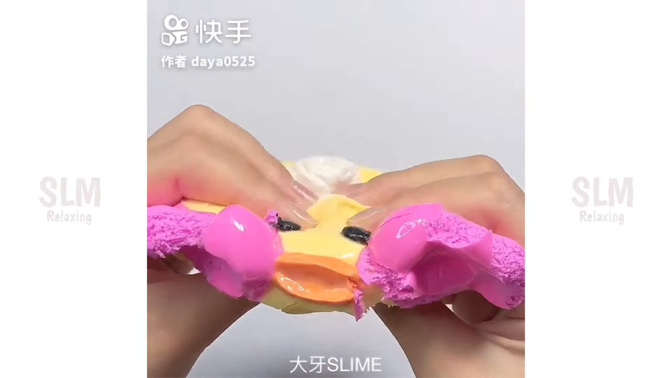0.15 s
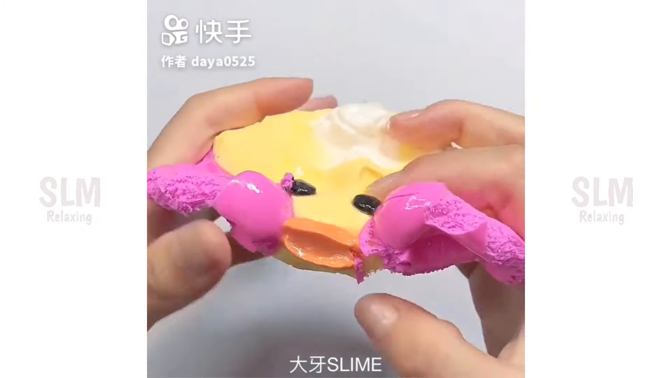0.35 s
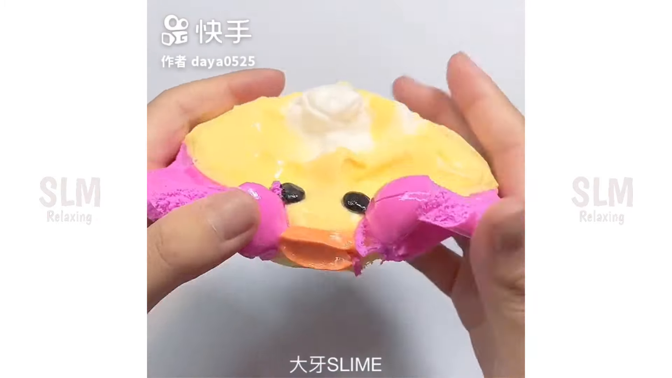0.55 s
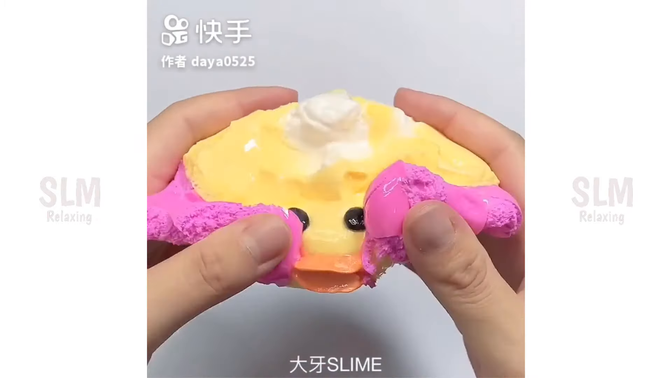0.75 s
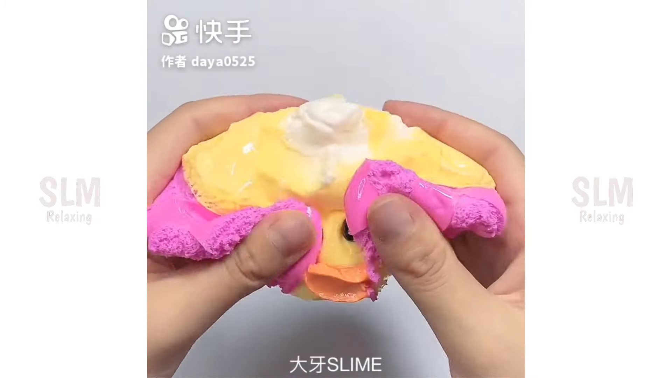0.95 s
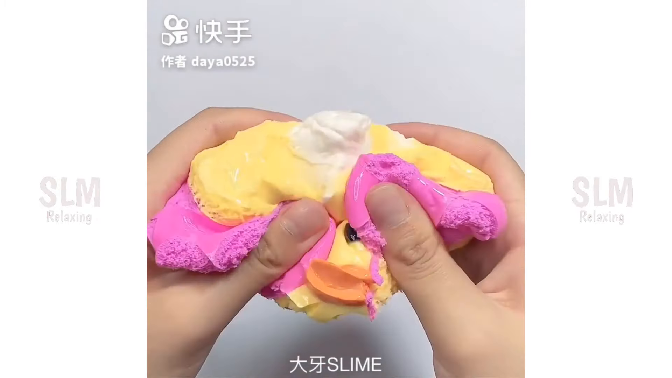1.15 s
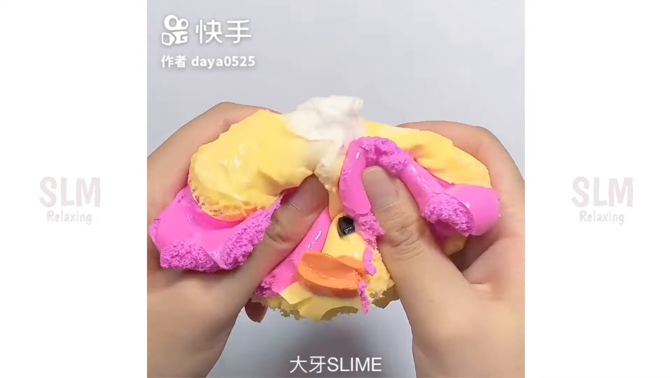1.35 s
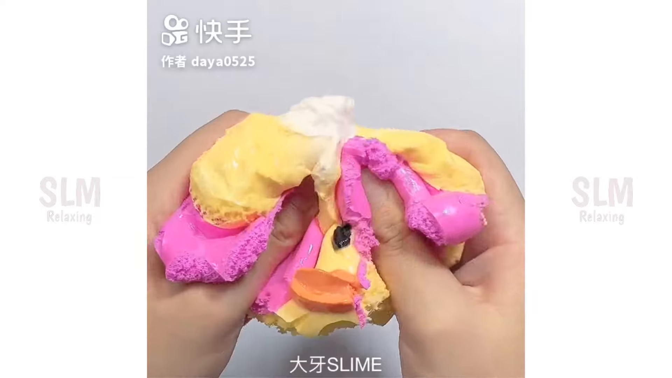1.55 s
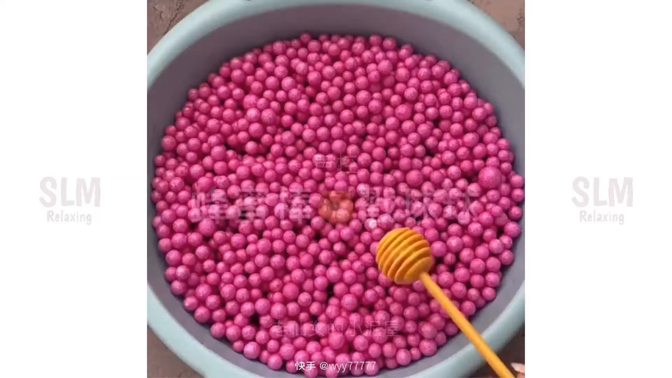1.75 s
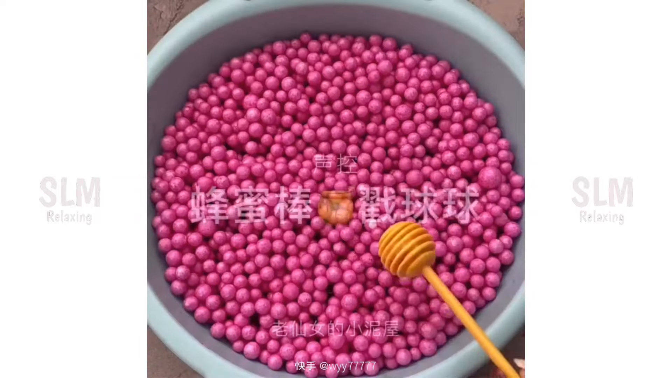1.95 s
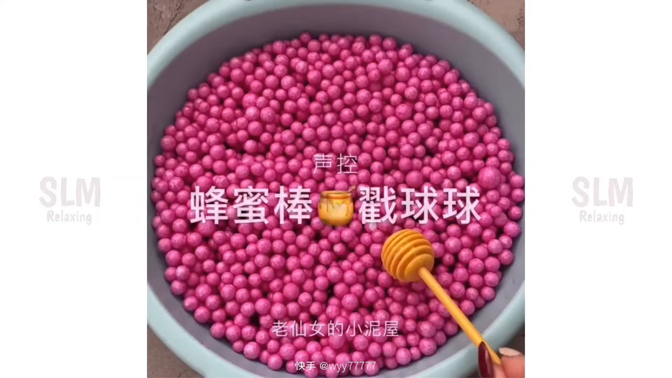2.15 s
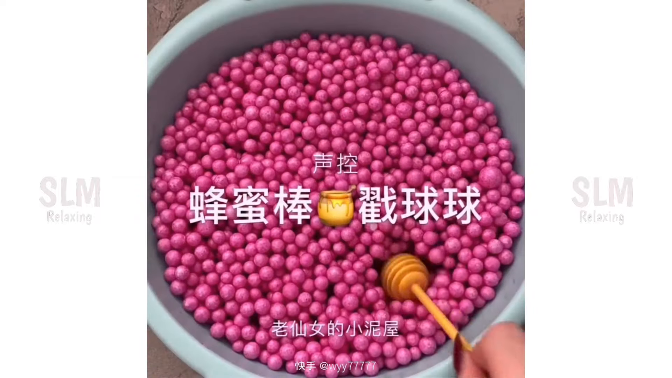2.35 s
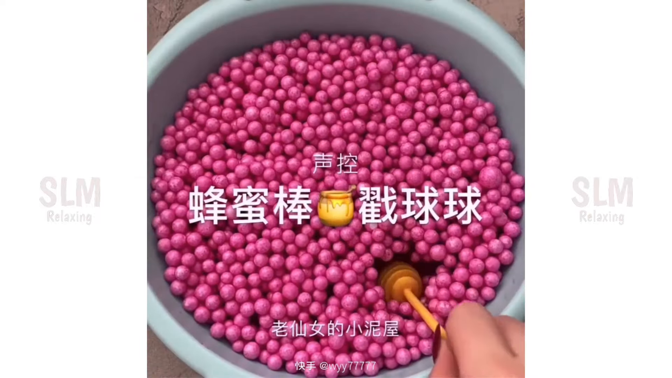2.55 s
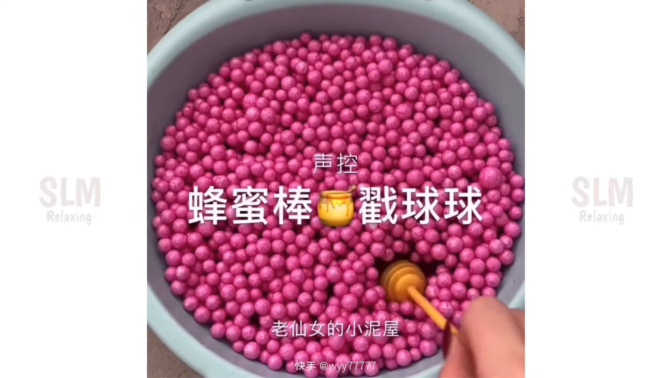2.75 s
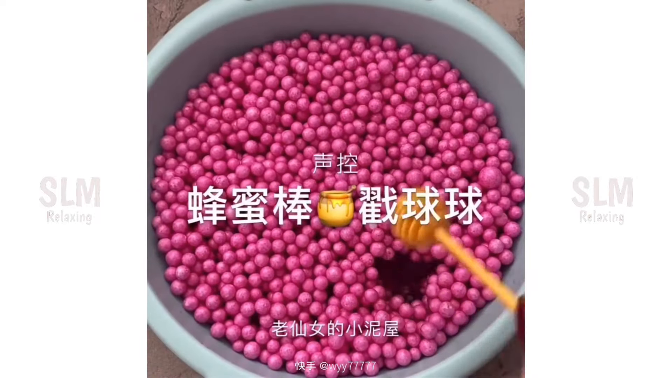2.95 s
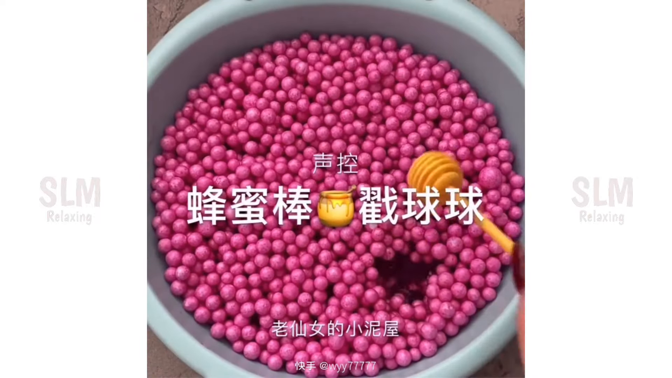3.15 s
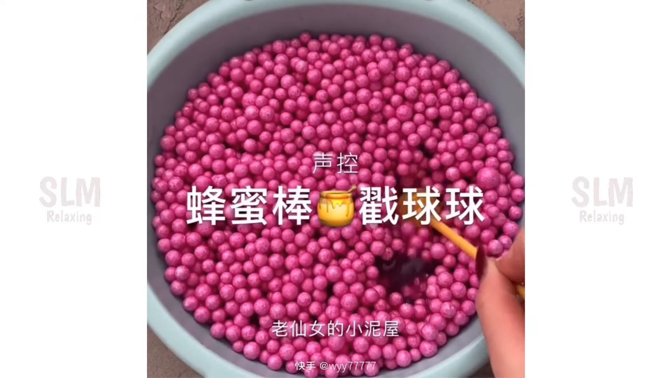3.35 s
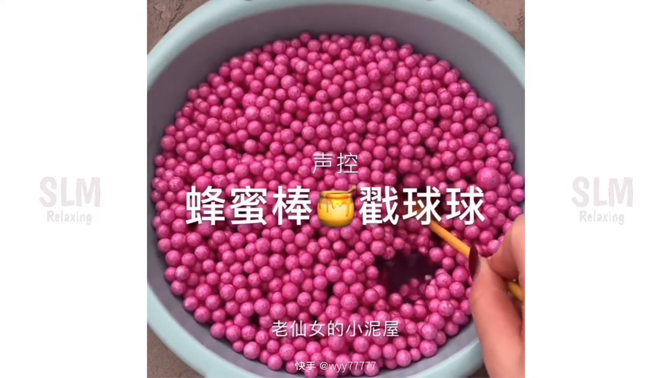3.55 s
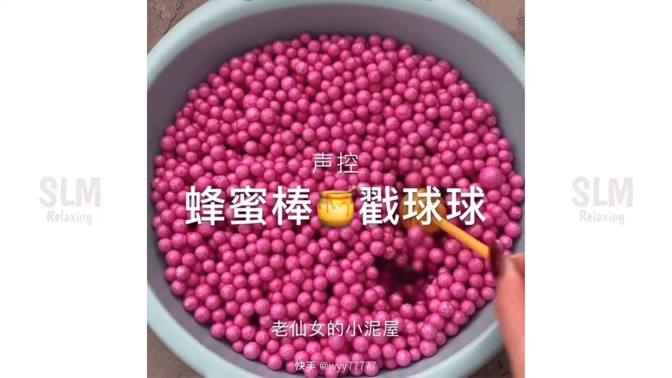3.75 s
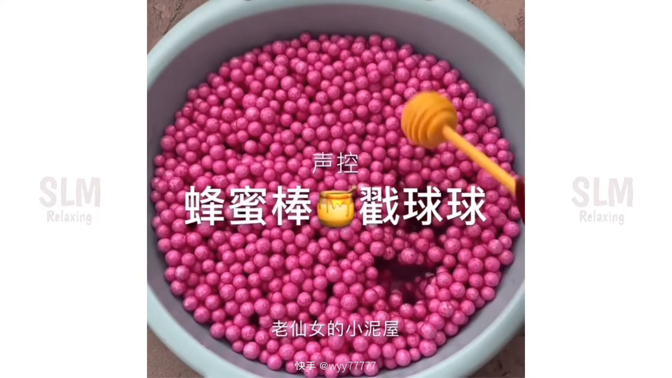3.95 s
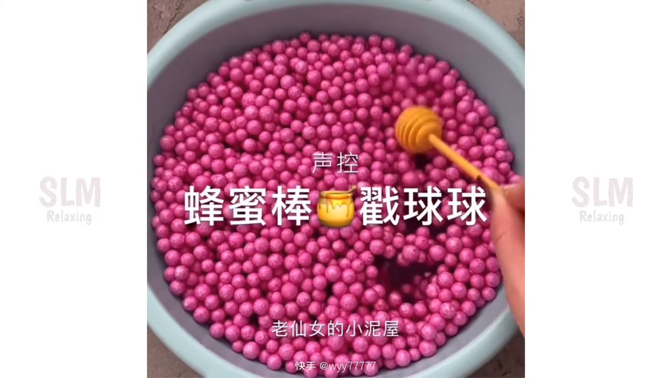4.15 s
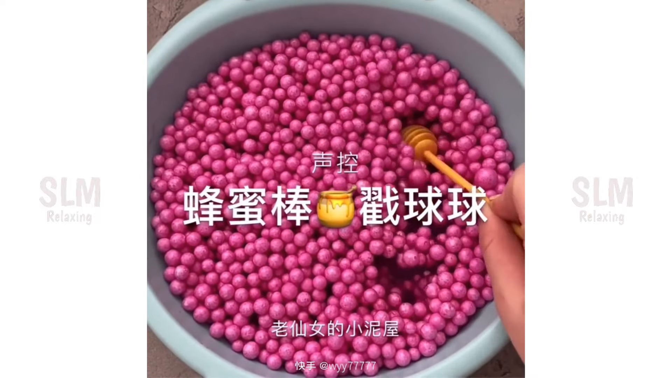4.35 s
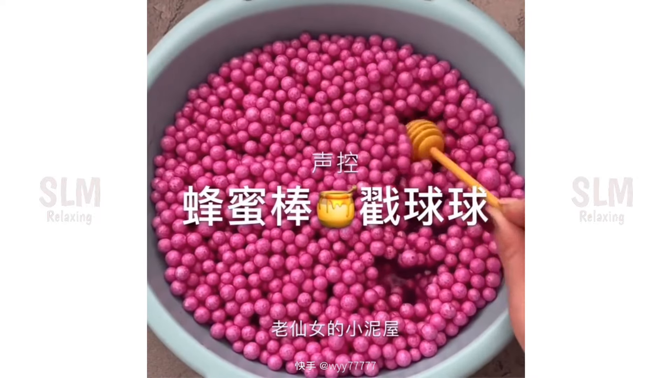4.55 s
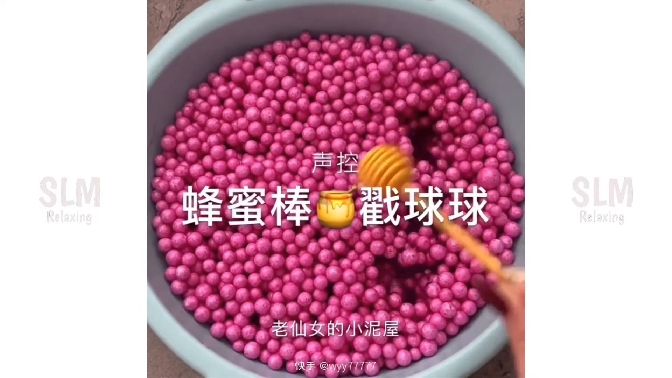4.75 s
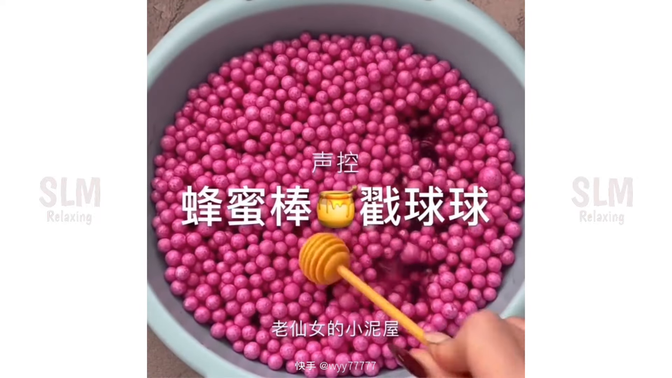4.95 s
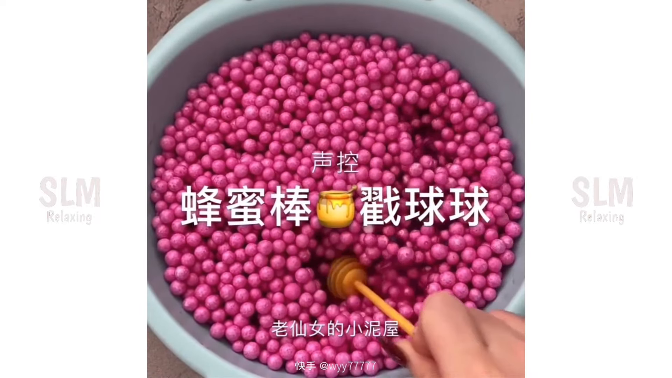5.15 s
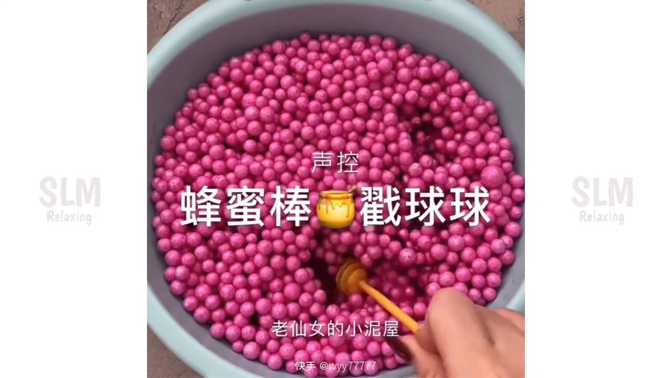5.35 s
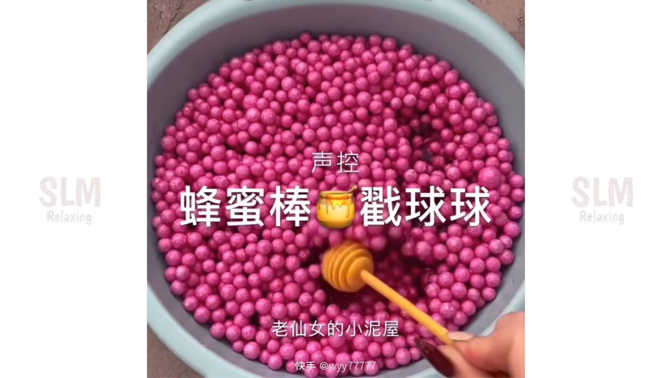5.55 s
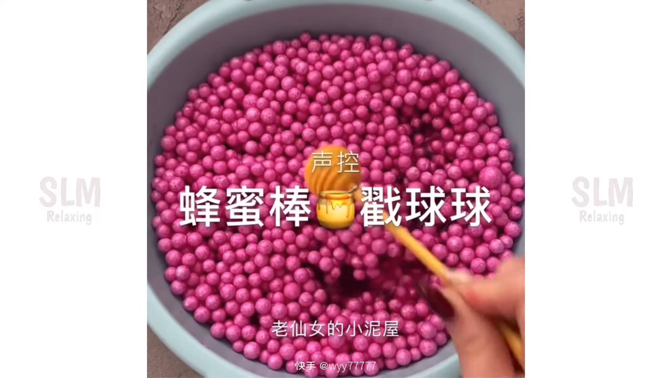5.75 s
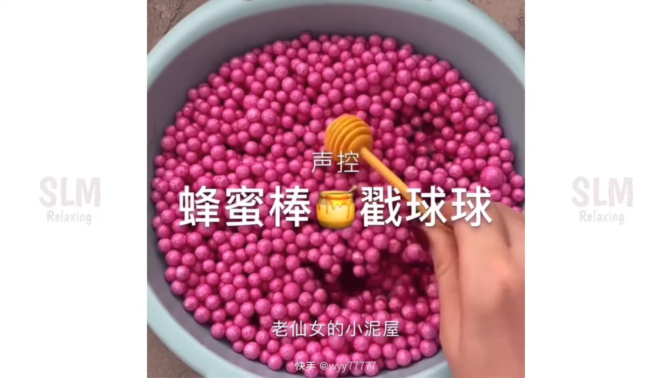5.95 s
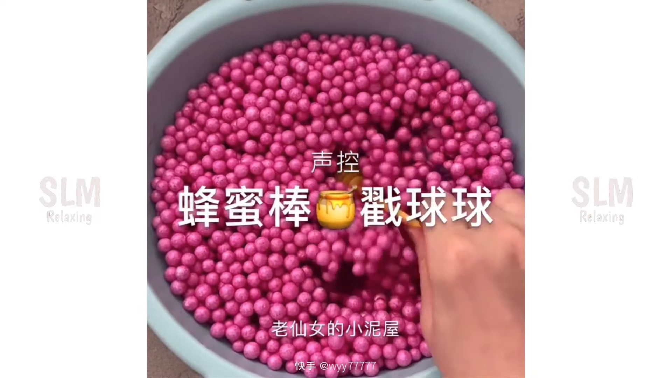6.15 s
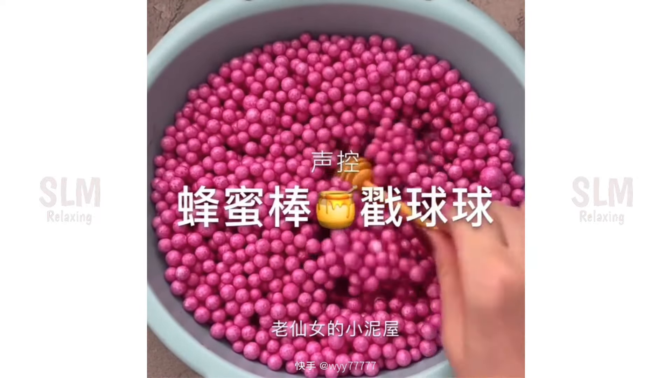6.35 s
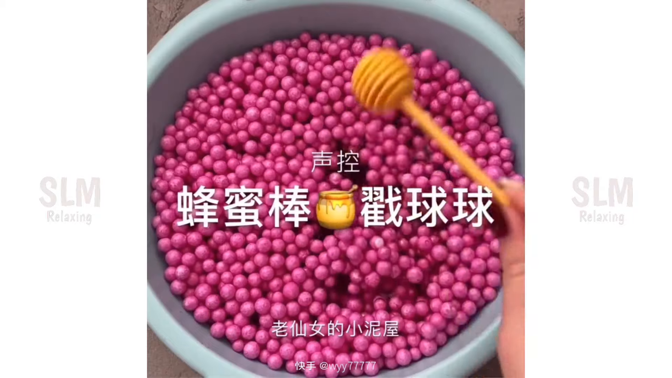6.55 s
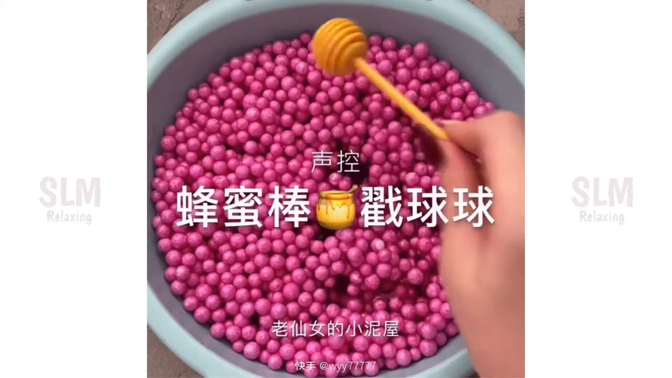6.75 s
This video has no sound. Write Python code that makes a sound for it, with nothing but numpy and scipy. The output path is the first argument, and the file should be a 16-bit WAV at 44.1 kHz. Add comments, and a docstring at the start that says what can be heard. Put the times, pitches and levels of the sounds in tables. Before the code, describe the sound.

From 0 to 1.7 s, hands knead a crusted slime close to a mono microphone. Sharp wet snaps with very short rings cluster at 0-0.15 and around 0.3 s, thin out, then become a dense crackle from 0.9 to 1.5 s, over fine sticky hiss and a quiet, very low hum beating about once a second. Near silence follows until 1.8 s. Then, in close stereo, a wooden dipper works in a basin of foam beads. Bright, gritty crunches swell at about 2.2, 3.2, 4.1, 4.9 and 5.95 s, turning hollower as the dipper sinks, with clicking pops, dull low thuds and brief rumble. Between them come softer rubs, scattered pops and short ridge rattles near 2.55, 3.3, 5.1 and 5.3 s. Tiny high squeaks chirp at 4.5 and 5.85 s. After 6.25 s, lighter rubs and isolated clicks fade toward faint settling.

```python
"""Wet snaps and sticky hiss over a low, beating hum; then a short silence, and crunching, popping beads.
Hands knead a crusted slime close to a mono microphone: noise bursts with short rings snap over grainy hiss.
Then a wooden dipper is pushed into a basin of sticky foam beads, heard by a pair of microphone ports:
enveloped grain noise crunches, beads tear loose as clicks and slip as brief tones, ridges rattle past,
and decaying low modes make the basin thud over a rumble that rises around each plunge."""
import sys
import numpy as np
from scipy import signal
from scipy.fft import rfft, irfft, next_fast_len
from scipy.io import wavfile
from scipy.ndimage import uniform_filter1d

SR = 44100
rng = np.random.default_rng(int(sys.argv[2]) if len(sys.argv) > 2 else 0)


def materialize(psi):
    """Save the field psi as 16-bit PCM at rate SR to the path in sys.argv[1].

    A 1-D psi becomes a single channel; in a 2-D psi each row is a channel.
    """
    bounded = np.clip(np.atleast_2d(psi).T, -1, 1)
    quanta = np.round(bounded * 32767).astype(np.int16)
    wavfile.write(sys.argv[1], SR, quanta)


N = 298998
T = np.arange(N) / SR

# Noise of the first room. Each row: frequency in Hz, relative density in dB per Hz.
FIRST_ROOM_SPECTRUM = [(25, -8.5), (52, -8.5), (260, -19), (600, -26.5), (3700, -40.5), (15500, -49.5)]
HUM_HZ, HUM_START_DB, HUM_GROWS_DB_PER_S = 47.8, -42.5, 0.5
BEAT_S, FIRST_NULL_S = 0.98, 0.14  # the hum swells and dies once a beat

# Low rumble of the second room. Each row: frequency in Hz, relative density in dB per Hz.
RUMBLE_SPECTRUM = [(30, -10), (55, 6), (183, -5.5), (900, -25), (1170, -46), (1980, -120)]
# Faint hiss of the second room. Each row: frequency in Hz, relative density in dB per Hz.
HISS_SPECTRUM = [(180, -38), (300, -9), (500, -8), (700, -16.5), (13000, -25)]
RUMBLE_DB, SHAKE_LAG_S, SHAKE_SPAN_S = -59, 0.057, 0.15

# Decay of the walls around the slime. Each row: frequency in Hz, time to fall 60 dB in seconds.
WALL_DECAY = [(300, 0.29), (14000, 0.17)]
# Skin of the slime breaking. Each row: start in seconds, relative level in dB, nominal ring in Hz.
SNAPS = [(0.0268, -6, 1900), (0.038, 2, 3620), (0.0414, -5, 1510), (0.0705, -9, 6370),
         (0.0921, -17.5, 5560), (0.1123, -2.5, 6110), (0.1344, -19.5, 6550), (0.1439, -14, 1955),
         (0.1531, -6.5, 3230), (0.2582, -15, 2900), (0.273, -15.5, 1410), (0.2843, -1.5, 3010),
         (0.2906, 0.5, 3660), (0.3058, -5.5, 3530), (0.3249, -21, 2003), (0.4427, -18, 5280),
         (0.466, -9, 2644), (0.576, -31.5, 3440), (0.7149, -6.5, 6260), (0.729, -15.5, 3930),
         (0.7716, -26.5, 6330), (0.8563, -32, 2285), (0.9016, -14.5, 3390), (0.919, -11, 3270),
         (0.9365, -7, 5290), (0.9835, -19.5, 1400), (1.025, -6.5, 2175), (1.0378, -10, 3060),
         (1.0465, -4.5, 3180), (1.0765, -15.5, 3070), (1.0873, -3.5, 1840), (1.1149, -4, 4780),
         (1.1192, -6.5, 3264), (1.1232, -2.5, 3190), (1.1564, -10, 3140), (1.1599, -6, 4950),
         (1.1793, -8, 5050), (1.189, -6, 5250), (1.224, -16.5, 4910), (1.243, -13.5, 6170),
         (1.2462, -15.5, 3567), (1.2857, -13, 6760), (1.3048, -14.5, 5880), (1.3186, -17, 2240),
         (1.3398, -1.5, 3010), (1.3634, -15, 4970), (1.4086, 1, 3060), (1.412, -12, 2366),
         (1.4329, -11.5, 3450), (1.4464, -5, 3000), (1.4603, -11.5, 1593), (1.4712, -13.5, 3165),
         (1.5058, -20, 4000), (1.5117, -16.5, 3060), (1.5212, -20, 3200), (1.5317, -6, 2854),
         (1.63, -28, 3200), (1.6466, -13.5, 3020)]
# Hiss of the slime stretching. Each row: time in seconds, level in dB.
STRETCH_HISS = [(0, -40.5), (.22, -49), (.29, -35.5), (.39, -44.5), (.67, -62.5), (.8, -59.5), (.93, -62.5),
                (1.0, -54), (1.44, -44.5), (1.7, -54.5)]
# Colour of that hiss. Each row: frequency in Hz, relative density in dB per Hz.
SLIME_SPECTRUM = [(110, -28.5), (354, -18.5), (662, -22), (900, -10.5), (3160, -8.5), (7000, -14),
                  (12700, -22.5), (16000, -37)]
# a snap is a spike, then the crust tears on more softly; nominal times to fall 60 dB
SNAP_T60_S, TEAR_T60_S, TEAR_DB = .006, .022, -11

# The dipper loads the basin. Each row: start in seconds, relative level in dB,
# relative share of the upper mode and crunch in dB.
THUDS = [(2.06, -31.5, -7), (2.347, -16, 7.5), (3.166, -25.5, -27.5), (4.18, -11, -5), (4.898, -21, -32),
         (6.0849, -18, 18), (6.094, -15.5, 6.5)]
# Modes of the basin, the upper one last. Each row: nominal frequency in Hz, relative level in dB,
# time to fall 60 dB in seconds.
BASIN_MODES = [(69.1, -1.5, 0.27), (107, 0, 0.21), (164, 0, 0.2), (200.3, 6.5, 0.093), (365, -1.5, 0.072),
               (591, -10.5, 0.036)]

# Brief tones: high squeaks, and two very faint low tones of unknown source. Each row: start in seconds,
# length in seconds, first frequency in Hz, last frequency in Hz, nominal level in dB.
BRIEF_TONES = [(3.857, .1, 746, 788, -65), (4.507, .026, 5900, 5700, -25), (4.51, 0.016, 2680, 2610, -36.5),
               (4.594, 0.14, 706, 563, -64.5), (5.844, 0.014, 5125, 5200, -19),
               (5.845, 0.01, 8800, 8800, -14.5)]

# The dipper is pushed in. Each row: touch in seconds, swell in seconds, fade in seconds, peak level in dB,
# sag in dB, hollow part against the crunch in dB, table shake in dB.
PLUNGES = [(2.177, 0.11, 0.07, -18, 4, -18, 16), (3.169, 0.048, .17, -20, 10, -12, 15),
           (4.041, 0.11, 0.061, -13, 25.5, -11.5, 21.5), (4.9, 0.071, 0.064, -15.5, 11, -12, 20.5),
           (5.925, 0.079, 0.13, -13, 24, -16, 17.5)]
# The dipper rests on, drags through or pulls out of the beads. Each row: touch in seconds,
# swell in seconds, fade in seconds, peak level in dB, sag in dB, hollow part against the crunch in dB.
RUBS = [(2.053, 0.0027, 0.14, -46, 6, -29), (2.38, 0.048, 0.082, -35.5, 19.5, -2.5),
        (2.505, 0.022, 0.14, -39, 8.5, 0), (2.7, 0.12, 0.026, -34.5, 10.5, -4),
        (3.43, 0.011, 0.092, -57.5, -2.5, 2), (3.64, 0.092, 0.079, -36, 4, -11),
        (3.797, 0.012, 0.041, -37.5, 10, -18), (4.245, 0.0079, 0.11, -33.5, 35, -5.5),
        (4.462, 0.076, 0.22, -32.5, 25, -11), (5.04, 0.035, 0.09, -34.5, 5.5, -1.5),
        (5.243, 0.014, 0.17, -38.5, 1.5, -5), (5.45, 0.026, 0.022, -23.5, 1.5, -35),
        (5.543, 0.0033, 0.11, -32.5, 14, -13), (5.675, 0.024, 0.081, -32, 23.5, -22),
        (5.808, 0.021, 0.11, -25, 23.5, -19), (6.25, 0.02, 0.032, -32, -0.5, -11.5),
        (6.34, 0.056, 0.026, -28.5, 15.5, -9), (6.42, .01, 0.19, -39.5, 13, -13)]
ATTACK_DB_PER_S, RELEASE_DB_PER_S = 2994, 461.5
PLUNGE_TOUCH_DB, RUB_TOUCH_DB = 18, 8  # first contact under the peak
HOLLOWING_DB = 11  # a plunge turns hollow as the dipper sinks
SETTLING_DB, SETTLING_HOLLOW_DB = -76, -16.5  # beads creeping between strokes
# Colour of the crunch. Each row: frequency in Hz, relative density in dB per Hz.
CRUNCH_SPECTRUM = [(1470, -18), (2500, -6.5), (5390, -0.5), (14200, -3), (16000, -5)]
# Air between beads and dipper. Each row: resonance in Hz, width in Hz, relative level in dB.
AIR_RESONANCES = [(1370, 1030, -2), (1933, 420, 2.5), (2594, 320, 5), (7260, 6100, -9)]
# Single beads tearing loose. Each row: start in seconds, relative level in dB, ring in Hz.
POPS = [(2.182, -17.5, 5700), (2.194, -7.5, 5600), (2.2206, -10, 5600), (2.2393, -15, 4000),
        (2.2524, -11, 6100), (2.261, -4, 5570), (2.3213, -5.5, 2770), (2.333, -8, 2710), (2.3472, 0, 2800),
        (2.3594, -3.5, 2520), (2.728, -19.5, 2480), (2.778, -22, 6000), (3.1883, -23.5, 7600),
        (3.2023, 0, 5200), (3.2174, -4, 6430), (3.2461, -15, 6430), (3.265, -7, 4830),
        (3.3524, -13.5, 1890), (3.3643, -3, 6200), (3.459, -22.5, 1855), (3.503, -19, 7070),
        (3.699, -8.5, 5700), (3.702, -13.5, 7900), (3.728, -21.5, 2530), (3.754, -19, 6000),
        (3.803, -21, 6300), (3.885, -27.5, 9600), (4.003, -30, 7960), (4.068, -12, 7060), (4.081, -1, 5100),
        (4.0927, -6, 6650), (4.2503, -7.5, 5040), (4.2661, -6.5, 7270), (4.4627, -16.5, 6500),
        (4.4935, -17.5, 5500), (4.5215, -7, 5900), (4.571, -19, 2570), (4.6242, -14, 7800),
        (4.6892, -15, 5550), (4.763, -32, 6630), (4.896, -16, 5930), (4.9028, -2.5, 4050),
        (4.9292, -11, 5070), (4.946, -4.5, 2980), (4.976, 0.5, 4900), (5.24, -21, 5500),
        (5.4091, -10.5, 8140), (5.462, -18.5, 6100), (5.4668, -3.5, 5300), (5.5487, -13, 3450),
        (5.6209, -15, 1850), (5.6757, -18, 4940), (5.702, -18, 3800), (5.8265, -9.5, 3480),
        (5.849, -17.5, 5090), (5.9315, -21.5, 5260), (5.941, -9, 5300), (5.962, -2.5, 3500),
        (5.968, -2, 4300), (5.999, -12.5, 3770), (6.0128, -5, 3660), (6.184, -21, 6700), (6.223, -20, 4060),
        (6.2508, -11, 8900), (6.2755, -9, 5950), (6.345, -13.5, 6000), (6.3908, -11.5, 7340),
        (6.4738, -14, 2400), (6.5569, -17, 6300), (6.69, -28.5, 5050), (6.761, -29.5, 5970)]
# Ridges of the dipper clicking past bead after bead. Each row: start in seconds, end in seconds,
# relative level in dB, nominal ring in Hz.
RATCHETS = [(2.509, 2.67, -24, 1900), (3.285, 3.425, -17, 2200), (5.058, 5.17, -15, 2000),
            (5.269, 5.355, -24, 3900)]
CLICKS_PER_S, SLOWS_BY, LAST_CLICK_DB = 126, .5, -6  # starting rate, share of it lost, fade by the end

# Phase between the ports. Each row: frequency in Hz, lead of the left port in radians.
PORT_LEAD = [(2000, 0), (3800, .7), (4700, 3.1), (5200, 6.2), (9300, 8.4), (11400, 12.5), (16000, 14.6)]
# Match between the ports. Each row: frequency in Hz, left-right likeness (1 is identical).
PORT_LIKENESS = [(60, 1), (500, 0.11), (1100, 0.96), (2000, 1), (3000, 0.56), (5400, 0.6), (7000, 0.94),
                 (10700, 0.13), (16000, .4)]
CUT_S, BACK_S = 1.706, 1.79  # the silence between the scenes
TOP_HZ = 16100


def amp(db):
    """Decibels to linear gain."""
    return 10 ** (np.asarray(db) / 20)


def unit(x):
    """x brought to rms 1."""
    return x / np.sqrt(np.mean(x ** 2) + 1e-20)


def along(points, hz):
    """Reads (Hz, value) points on a log frequency axis."""
    f, v = np.transpose(points)
    return np.interp(np.log(hz + 1), np.log(f + 1), v)


def curves(rows):
    """One value per sample for each column after the time; -120 before the first row."""
    s, *cols = np.transpose(rows)
    return [np.interp(T, s, c, left=-120, right=c[-1]) for c in cols]


def filtered(x, response):
    """x shaped by a complex response of frequency."""
    m = next_fast_len(N + SR // 2)
    return irfft(rfft(x, m) * response(np.fft.rfftfreq(m, 1 / SR)), m)[..., :N]


def coloured(x, spectrum):
    """x through (Hz, dB) points, brought to rms 1."""
    return unit(filtered(x, lambda hz: amp(along(spectrum, hz))))


def low_cut(hz, corner_hz):
    """Response of two high-pass stages in a row."""
    return (hz / (hz + corner_hz / 1j)) ** 2


def place(s, shapes):
    """Sums the rows of shapes into the timeline at times s."""
    at = np.round(np.asarray(s) * SR).astype(int)[:, None] + np.arange(shapes.shape[1])
    return np.bincount(at.ravel(), shapes.ravel(), N + SR)[:N]


def grains(rate, spread_db, t60, size):
    """Envelope of random tiny breaks: few large, many small, each dying quickly."""
    draw = rng.random((int(rate * N / SR), 3))
    life = t60 * (.5 + draw[:, 1:2])
    level_db = -spread_db * np.log(draw[:, 2:] + .01)
    shapes = amp(level_db - 60 * np.arange(size) / SR / life)
    return np.sqrt(place(draw[:, 0] * N / SR, shapes ** 2))


def breaks(s, db, ring_hz, t60, rise, crack_db, ring_db, cycles, sharp_hz):
    """Each break is a burst of noise and a short ring of the cavity it opens."""
    t = np.arange(2048) / SR
    noise = rng.standard_normal((len(s), len(t)))
    start = amp(db)[:, None] * (1 - np.exp(-t / abs(rise)))
    turns = t * ring_hz[:, None]
    sharp = np.clip(ring_hz / sharp_hz, 0, 1)[:, None]  # small cavities crack brighter
    dull = 1.15 * uniform_filter1d(noise, size=3, axis=1)
    crack = amp(crack_db - 60 * t / np.abs(t60)[:, None]) * (sharp * noise + (1 - sharp) * dull)
    ring = amp(ring_db - 60 * turns / cycles) * np.sin(2 * np.pi * turns + noise[:, :1])
    return place(s, start * crack), place(s, start * ring)


def patchy(x, depth_db, size):
    """x with random patches of gain in pitch and time: the colour of the grind keeps shifting."""
    z = signal.stft(x, nperseg=256)[2]
    field = uniform_filter1d(rng.standard_normal(z.shape), size[0], axis=0)
    field = uniform_filter1d(field, size[1], axis=1)
    return signal.istft(z * amp(depth_db * unit(field)), nperseg=256)[1][:N]


def first_room():
    """A low sine that swells and fades in beats, over coloured room noise."""
    swell = amp(HUM_START_DB + HUM_GROWS_DB_PER_S * T) * np.sin(np.pi * (T - FIRST_NULL_S) / BEAT_S)
    hum = np.sqrt(2) * swell * np.sin(2 * np.pi * HUM_HZ * T)
    return hum + amp(-50.5) * coloured(rng.standard_normal(N), FIRST_ROOM_SPECTRUM)


def second_room():
    """Rumble that rises around each plunge as the table shakes, and a faint hiss."""
    noise = rng.standard_normal((2, 2, N))
    shake_db = np.zeros(N)
    for s, swell, *_, db in PLUNGES:
        away = np.abs(T - s - swell - SHAKE_LAG_S)
        shake_db += db * np.clip(1 - away / SHAKE_SPAN_S, 0, 1)
    rumble = amp(RUMBLE_DB + shake_db) * coloured(noise[0], RUMBLE_SPECTRUM)
    return rumble + amp(-68.5) * coloured(noise[1], HISS_SPECTRUM)


def walls(x):
    """The room's answer: a noise tail in which each frequency dies at its own speed."""
    hz, t, z = signal.stft(rng.standard_normal(SR // 2), SR, nperseg=256)
    decay = amp(-60 * t / along(WALL_DECAY, hz)[:, None])
    tail = signal.istft(z * decay, SR, nperseg=256)[1]
    late = np.pad(x, (150, 0))  # delay in samples
    return signal.fftconvolve(late, tail / np.linalg.norm(tail))[:N]


def slime():
    """Snaps of the crust, each a spike and a softer tear, over a fine sticky hiss of tiny breaks."""
    s, db, ring_hz = np.transpose(SNAPS)
    life = 2 ** rng.uniform(-.5, .5, len(s))
    spike, ring = breaks(s, db, ring_hz, SNAP_T60_S * life, rise=0.00018,
                         crack_db=1.5, ring_db=-1.5, cycles=11.8, sharp_hz=7750)
    tear_s = np.maximum(s - .0012, 0)
    tear, throb = breaks(tear_s, db + TEAR_DB, .85 * ring_hz, TEAR_T60_S * life, rise=0.0018,
                         crack_db=5.5, ring_db=-6.5, cycles=10, sharp_hz=7900)
    crack = filtered(spike + tear, lambda hz: low_cut(hz, 900) / (1 + 1j * hz / 7000))
    bubbles = grains(rate=1200, spread_db=4, t60=.014, size=900) * rng.standard_normal(N)
    hiss = amp(curves(STRETCH_HISS)[0]) * coloured(bubbles, SLIME_SPECTRUM)
    near = crack + ring + throb + hiss
    return near + amp(-14.5) * walls(near)


def basin():
    """Blows ring the low modes of the basin; each adds its own share of upper mode and crunch."""
    t = np.arange(SR // 3) / SR
    rise = 1 - np.exp(-t / 0.0084)
    rows = []
    for s, db, upper_db in THUDS:
        modes = []
        for hz, level_db, t60 in BASIN_MODES:
            tone = np.sin(2 * np.pi * hz * t * rng.normal(1, 0.038))  # each blow detunes the mode
            modes.append(amp(level_db - 60 * t / t60) * tone)
        crunch = amp(3 - 60 * t / .04) * uniform_filter1d(rng.standard_normal(len(t)), size=20)
        upper = amp(upper_db + 15.5) * (modes[-1] + crunch)
        rows.append(amp(db - 13.0) * (sum(modes[:-1]) + upper) * rise)
    return place(np.transpose(THUDS)[0], np.array(rows))


def brief_tones():
    """Brief sines of unsteady level, steady or gliding: high squeaks, two very faint low tones."""
    tones = np.zeros(N)
    for s, length, first_hz, last_hz, db in BRIEF_TONES:
        u = np.clip((T - s) / length, 0, 1)
        turns = length * (first_hz * u + (last_hz - first_hz) * u ** 2 / 2)
        swell = np.sqrt(np.abs(np.sin(np.pi * u))) * (u < 1)
        tones += amp(db) * swell * np.sin(2 * np.pi * turns)
    return tones * (1 + 0.71 * unit(uniform_filter1d(rng.standard_normal(N), size=40)))


def bead_slips(rate, centre_hz, octaves, cycles, spread_db):
    """Single beads slipping on each other: brief tones of random pitch; two fields differ in phase only."""
    draw = rng.random((int(rate * N / SR), 5))
    s = draw[:, 0] * N / SR
    hz = np.clip(centre_hz * 2 ** (octaves * (2 * draw[:, 1:2] - 1)), 500, 15000)
    turns = hz * np.arange(400) / SR
    level_db = -spread_db * np.log(draw[:, 2:3] + 0.022)
    shape = amp(level_db - 60 * turns / cycles) * (1 - np.exp(-turns))
    return [unit(place(s, shape * np.sin(2 * np.pi * (turns + draw[:, [k]])))) for k in (3, 4)]


def ratchets():
    """Start, level and ring of every ridge click: almost regular, slowing towards the end of each run."""
    rows = []
    for start, end, db, hz in RATCHETS:
        u = np.linspace(0, 1, 200)
        passed = CLICKS_PER_S * (end - start) * (u - SLOWS_BY * u ** 5 / 5)
        draw = rng.standard_normal((40, 3))
        at = np.interp(np.arange(40) + .08 * draw[:, 0], passed, u, right=2)
        for a, (_, level, pitch) in zip(at, draw):
            if a <= 1:  # later clicks fall outside the run
                click_db = db + LAST_CLICK_DB * a ** 2 + 2 * level
                rows.append((start + a * (end - start), click_db, hz * (1 + .1 * pitch)))
    return np.transpose(rows)


def air_gaps(f):
    """Response of the air between beads and dipper: band resonances of alternating sign."""
    total = 0
    for k, (centre, width, db) in enumerate(AIR_RESONANCES):
        band = 1j * f * width
        total = total + (-1) ** k * amp(db) * band / (centre * centre - f * f + band)
    return total


def strokes(rows, touch_db, hollowing_db):
    """Power of crunch and of its hollow part: quick contact, swell to the peak, steady sag, release."""
    t = T[::32]
    crunch, hollow = np.zeros(len(t)), np.zeros(len(t))
    for s, swell, fade, peak_db, sag_db, hollow_db, *_ in rows:
        before = np.clip(1 - (t - s) / abs(swell), 0, 1)
        after = np.clip((t - s - swell) / abs(fade), 0, 1)
        attack_db = ATTACK_DB_PER_S * np.maximum(s - t, 0)
        release_db = RELEASE_DB_PER_S * np.maximum(t - s - swell - fade, 0)
        db = peak_db - touch_db * before ** 1.57 - sag_db * after - attack_db - release_db
        crunch += amp(db) ** 2
        hollow += amp(db + hollow_db + hollowing_db * after) ** 2
    return np.array([np.interp(T, t, crunch), np.interp(T, t, hollow)])


def grinding():
    """Level in dB of the crunch and of the hollow part against it, summing the power of all strokes."""
    power = amp([[SETTLING_DB], [SETTLING_DB + SETTLING_HOLLOW_DB]]) ** 2
    power = power + strokes(PLUNGES, PLUNGE_TOUCH_DB, HOLLOWING_DB) + strokes(RUBS, RUB_TOUCH_DB, 0)
    crunch_db, hollow_db = 10 * np.log10(power)
    return crunch_db, hollow_db - crunch_db


def beads():
    """Crunch, pops and clicks as two fields: same events and grain envelope, unrelated noise within, for the
    ports to share out."""
    crunch_db, hollow_db = grinding()
    fine = unit(grains(rate=1500, spread_db=4.5, t60=.008, size=450))
    lumps = unit(grains(rate=260, spread_db=4, t60=.012, size=800))
    rub = fine + .5 * lumps  # beads give way in lumps
    s, db, ring_hz = np.transpose(POPS)
    clicks = ratchets()
    beds = [patchy(row, 3.4, size=(14, 8)) for row in rng.standard_normal((2, N))]
    slips = bead_slips(rate=420, centre_hz=7040, octaves=.75, cycles=170, spread_db=-1.0)
    fields = []
    for bed, slip in zip(beds, slips):
        bright = coloured(rub * bed, CRUNCH_SPECTRUM) + amp(-13) * slip
        hollow = filtered(rub * patchy(rng.standard_normal(N), 4.5, size=(4, 20)), air_gaps)
        pop, ring = breaks(s, db, ring_hz, np.full(len(s), .01), rise=.0005,
                           crack_db=-3, ring_db=-5, cycles=22, sharp_hz=2000)
        tick, knock = breaks(*clicks, np.full(clicks.shape[1], .006), rise=.0002,
                             crack_db=1, ring_db=-4, cycles=11, sharp_hz=2000)
        crack = filtered(pop + tick, lambda hz: low_cut(hz, 1500))
        grind = amp(crunch_db) * (unit(bright) + amp(hollow_db) * unit(hollow))
        fields.append(grind + crack + ring + knock)
    return np.array(fields)


def ports(fields):
    """The ports hear one field alike and the other opposed; the left leads by a phase that depends on pitch."""
    def share(hz):
        turn = np.arccos(np.clip(along(PORT_LIKENESS, hz), -1, 1)) / 2
        return np.array([np.cos(turn), np.sin(turn)])

    def phase(hz):
        lead = np.exp(.5j * np.interp(hz, *np.transpose(PORT_LEAD)))
        return np.array([lead, 1 / lead])

    mid, side = filtered(fields, share)
    return filtered(np.array([mid + side, mid - side]), phase)


def scene():
    """The slime, a short silence, then the beads fading in."""
    first = (first_room() + slime()) * (T < CUT_S)
    thuds = np.array([basin(), amp(-6.5) * basin()])
    fields = second_room() + thuds + brief_tones() + beads()
    return first + ports(fields) * np.clip((T - BACK_S) / 0.064, 0, 1)


def record(dry):
    """Softly clips the loudest peaks, stops everything above TOP_HZ and rolls off the deep bass."""
    wet = dry / (1 + np.abs(dry / .6) ** 4) ** (1 / 4)

    def band(hz):
        return np.clip((TOP_HZ - hz) / 300, 0, 1) ** 2 * hz ** 4 / (hz ** 4 + 38 ** 4)

    return filtered(wet, band)


dry = scene()
out = record(dry)
materialize(out)
```